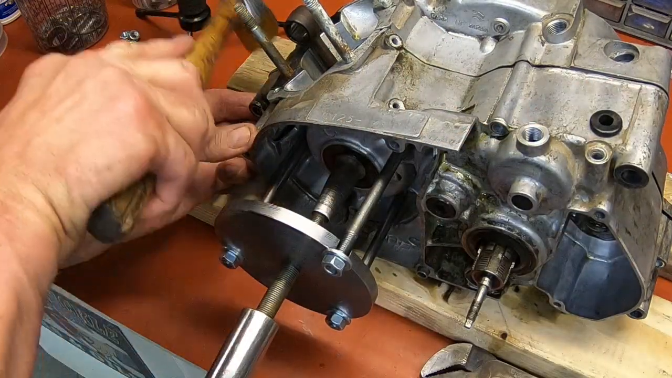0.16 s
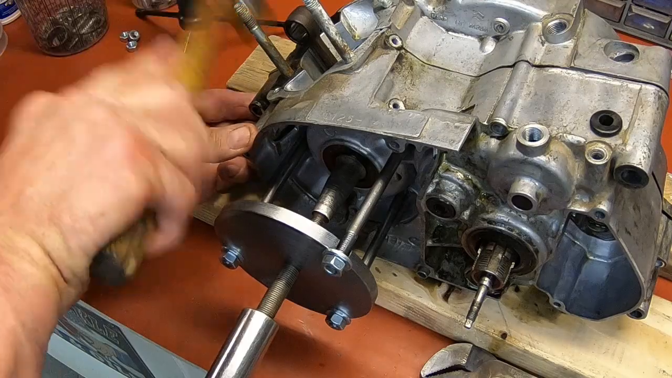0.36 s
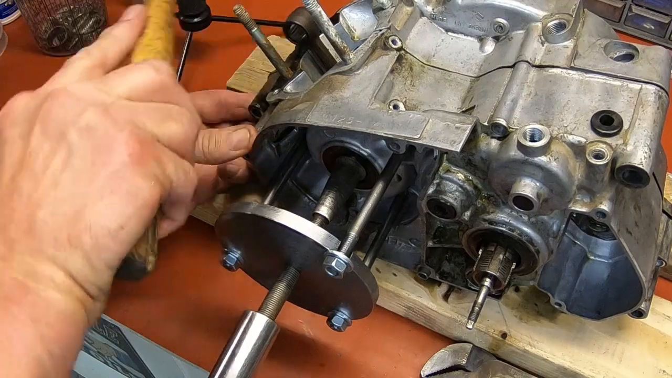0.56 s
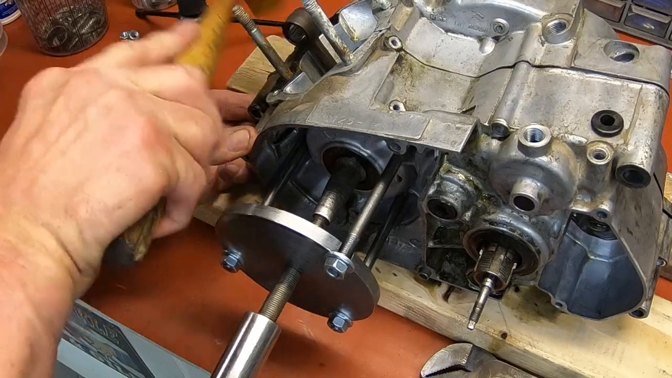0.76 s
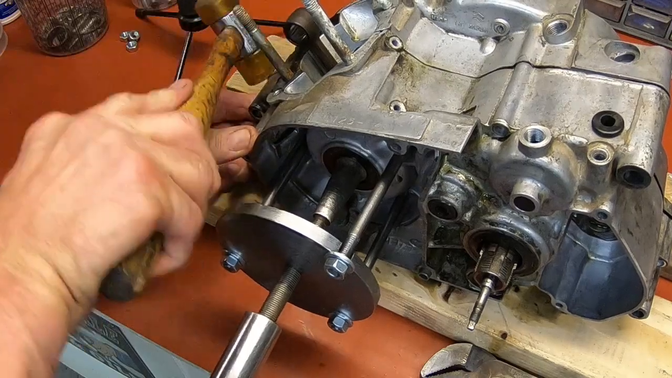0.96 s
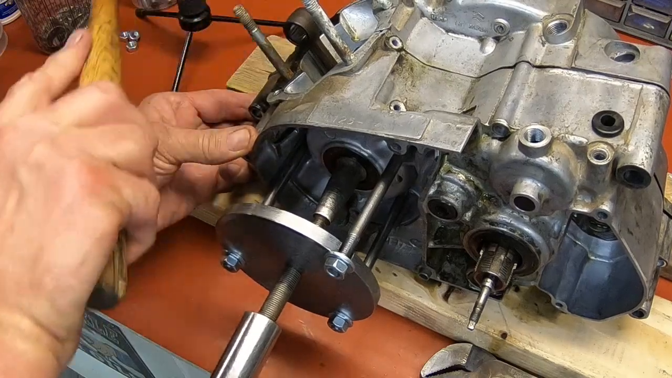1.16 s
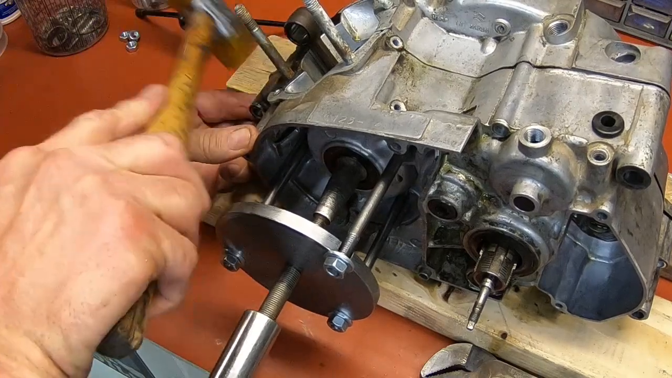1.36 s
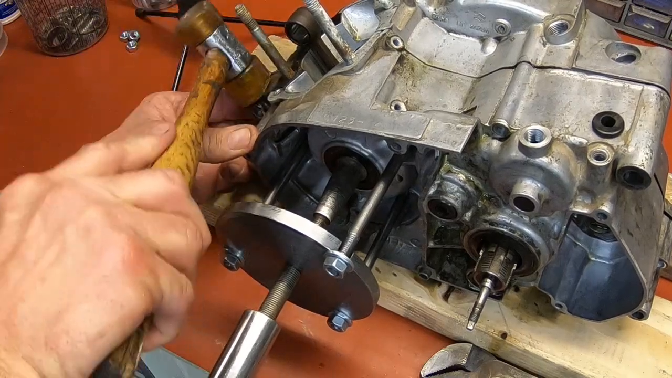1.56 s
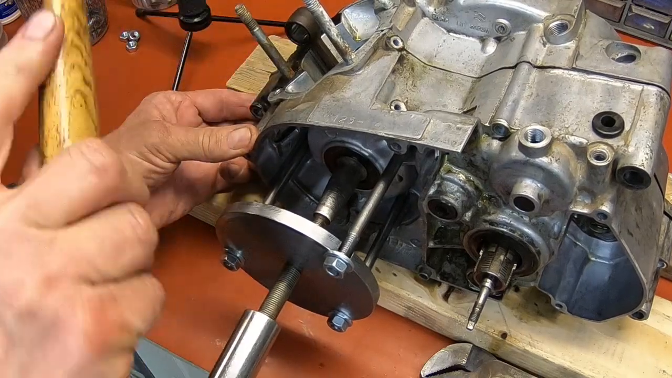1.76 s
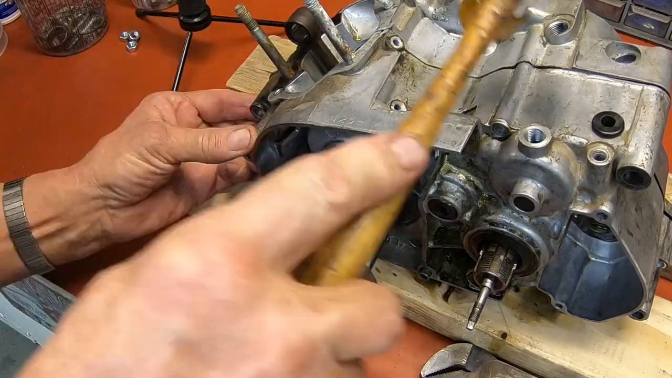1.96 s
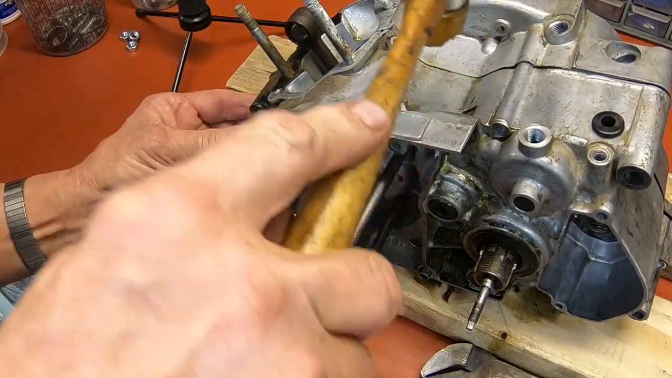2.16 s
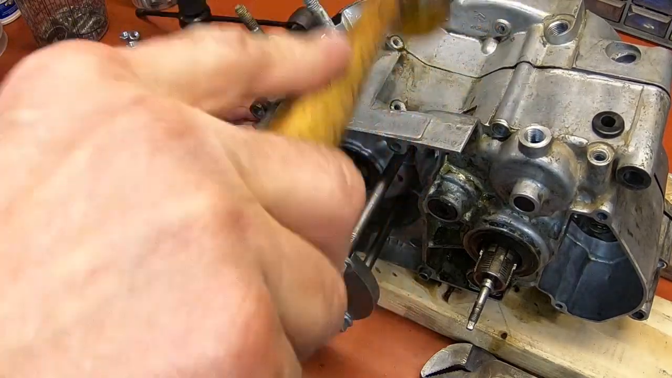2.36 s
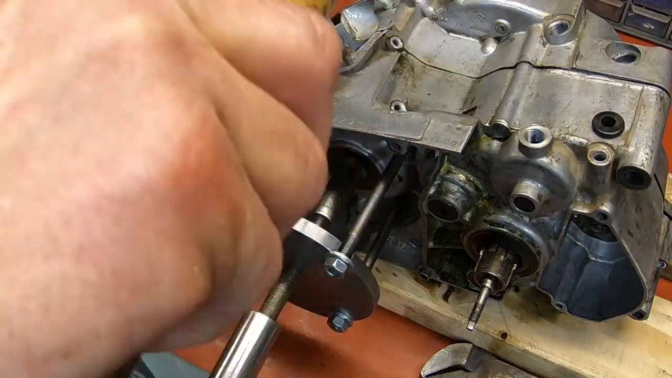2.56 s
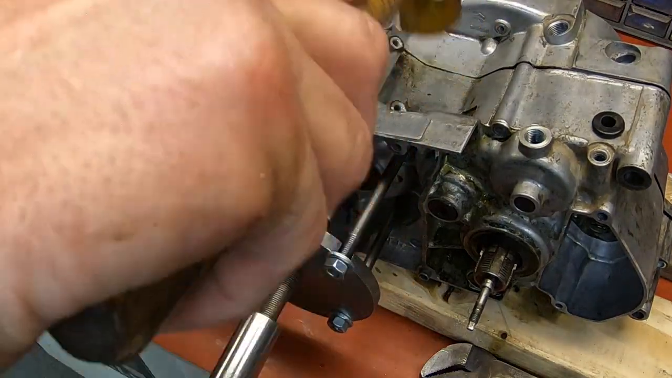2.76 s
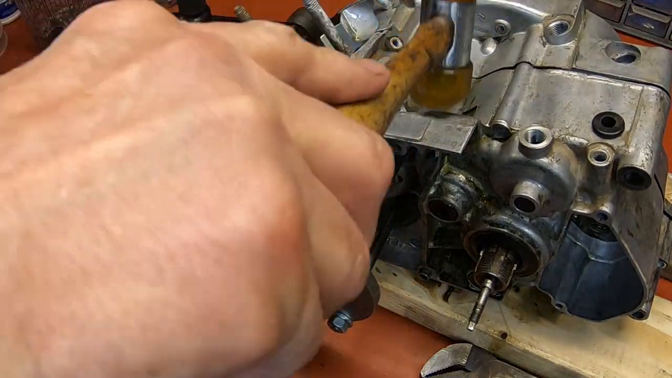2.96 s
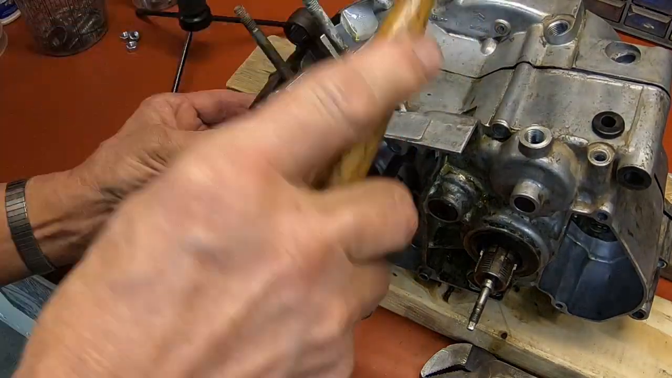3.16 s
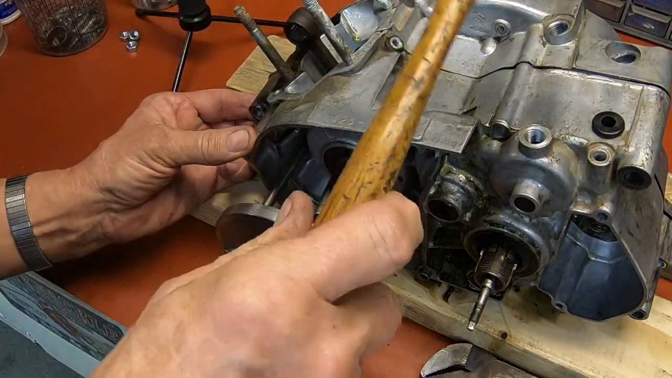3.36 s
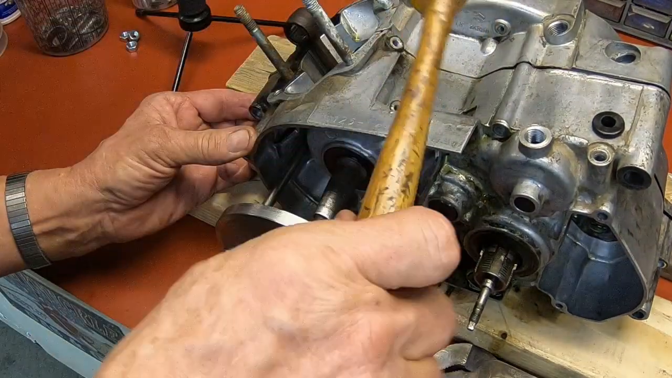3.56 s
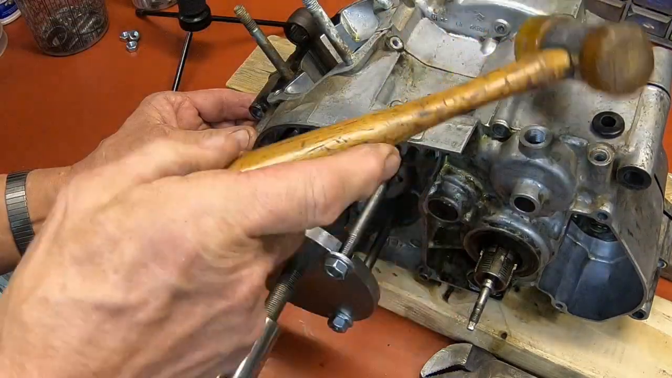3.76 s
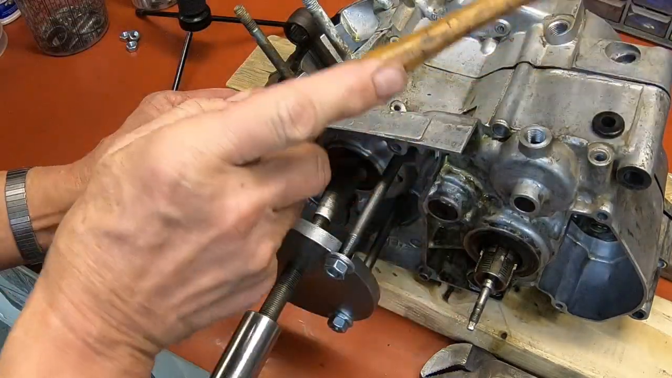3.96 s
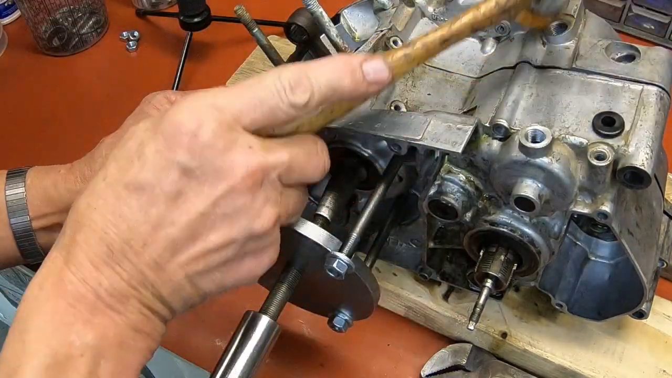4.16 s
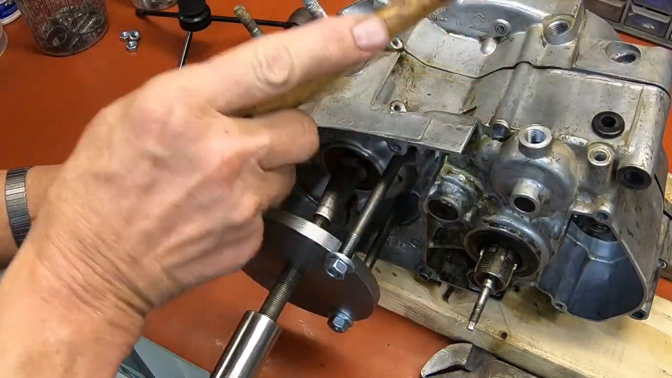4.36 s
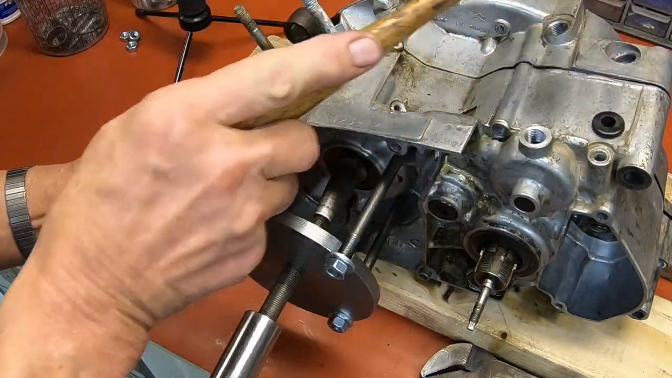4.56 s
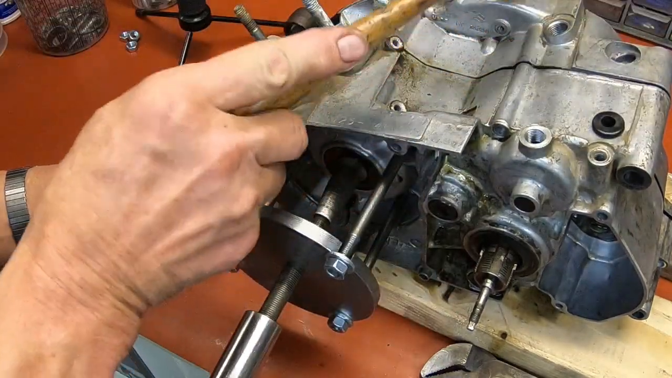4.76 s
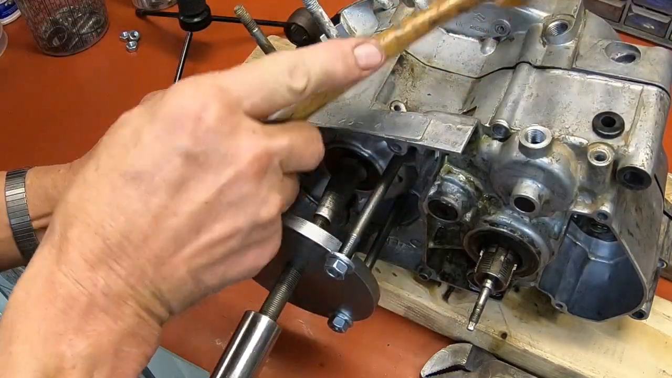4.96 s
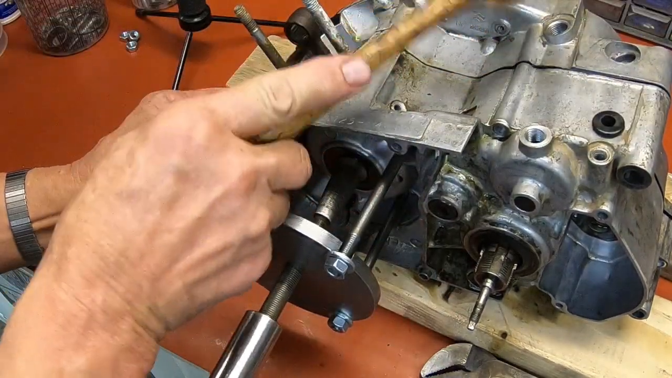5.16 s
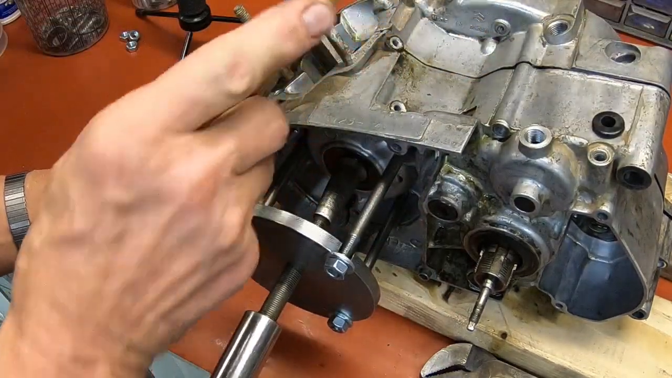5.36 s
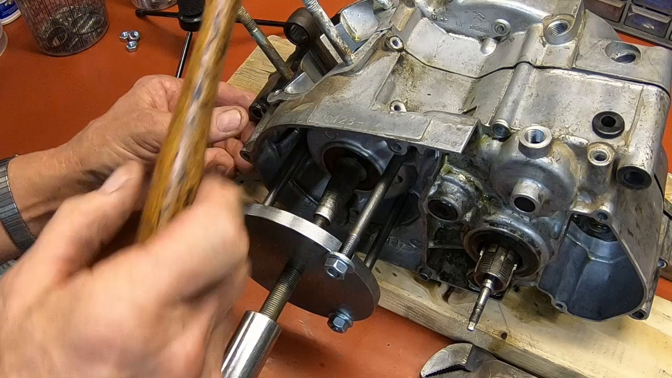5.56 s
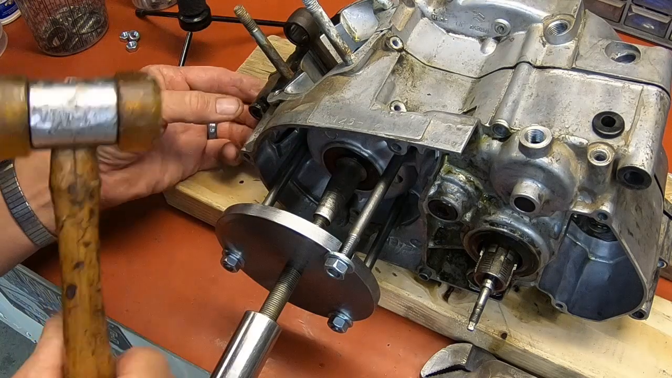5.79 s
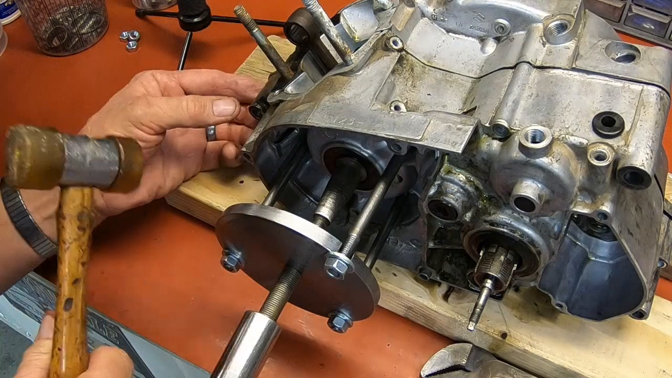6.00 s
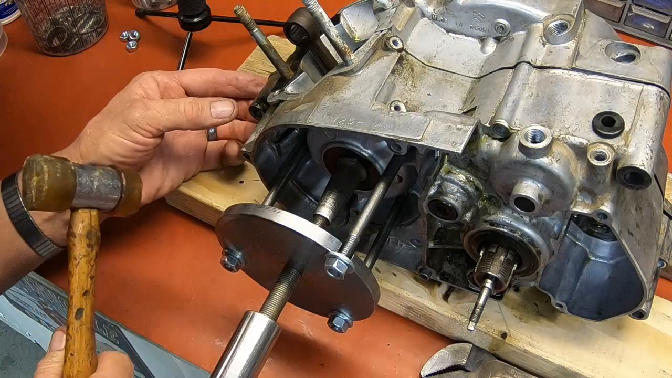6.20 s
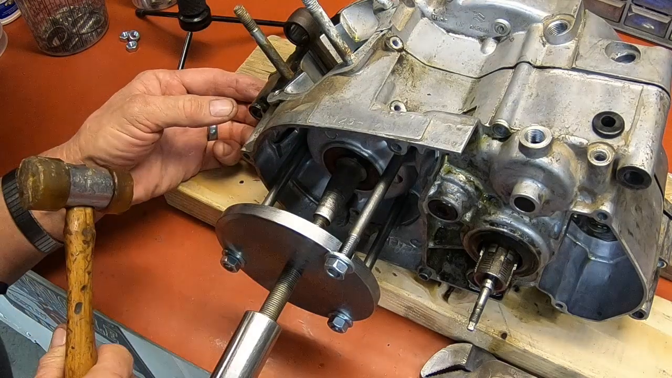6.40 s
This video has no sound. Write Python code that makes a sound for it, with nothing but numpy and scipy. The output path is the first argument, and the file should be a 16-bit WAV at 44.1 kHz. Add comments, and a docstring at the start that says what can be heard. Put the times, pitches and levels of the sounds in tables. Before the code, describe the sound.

A plastic mallet raps an aluminium engine case six times in quick succession, each hit ringing briefly and rattling loose studs. After a pause come three more knocks with a light metallic jingle and a low bump of air on the close microphone. A hand slides faintly on the handle, then a last run of taps builds in strength. The workshop adds a short echo and a faint hum.

```python
"""Mallet raps on an engine crankcase

A plastic mallet strikes an aluminium crankcase on a wooden block, at three spots in turn. Each impact
excites the damped modes of the case; loose studs and a puller rattle, rebounds tick, and the workshop
reverberates. A hand slides on the handle between the rounds, air rumbles round the microphone,
machines hum far off, and the loudest raps overload the recorder."""
import sys
import numpy as np
from scipy import signal
from scipy.fft import rfft, irfft, next_fast_len
from scipy.io import wavfile
from scipy.ndimage import uniform_filter1d, map_coordinates

SR = 44100
rng = np.random.default_rng(int(sys.argv[2]) if len(sys.argv) > 2 else 0)


def put_to_file(sound):
    """Save the sound as 16-bit audio at rate SR, in the file named by the first command-line argument."""
    columns = np.atleast_2d(sound).T  # one column per channel
    safe = np.clip(columns, -1, 1)
    whole_steps = np.round(safe * 32767)
    wavfile.write(sys.argv[1], SR, whole_steps.astype(np.int16))


N = 283665

# mallet blows: start_s, level_db, then relative to it: hardness_db, fullness_db, rattle_db, jingle_db
BLOWS = [(0.013, 4, 4.5, -10, -8, -25), (0.317, 5.5, 4.5, -8, -13, -22), (0.588, 5, 3.5, -6.5, -13, -33),
         (0.849, 5, 5.5, -11, -9, -29), (1.194, 4, 7, -6.5, -12.5, -30.5), (1.44, -3, 6.5, -5, -6, -23),
         (2.337, -1, -2, -1.5, -5.5, 1), (2.604, 1.22, 9, -2.5, -4.5, -13), (2.831, 1.5, 6.5, -3.5, -7, -9),
         (3.75, -18, 3.5, -3.5, -19, -56), (4.099, -5.5, -1.7, 3, -22, -50),
         (4.364, 3, 0.8, -4, -19.5, -28), (4.599, 3.5, .6, -1.1, -15.5, -30.5),
         (4.852, 4.5, -0.36, -4, -14.5, -23), (5.104, 5, -3, -5, -12.5, -24),
         (6.085, -38.5, -7, 1.52, -36, -45)]
# the mallet moves on to the second and third spot: start_s
SPOT_CHANGES = [2, 3.9]
# what a blow shakes, relative to its level, one row a spot: thump_db, chatter_db, shudder_db
COUPLING = [(-31, -36, -44), (-40, -33, -49), (-30, -32.5, -48)]


def amp(db):
    """Amplitude ratio of a level in decibels."""
    return 10 ** (np.asarray(db) / 20)


def unit(x):
    """Normalisation to an rms of 1."""
    return x / np.sqrt(np.mean(x ** 2) + 1e-20)


def along(points, hz):
    """Interpolation of (frequency_hz, value) points on a logarithmic frequency axis."""
    knots_hz, values = np.transpose(points)
    return np.interp(np.log(hz + 1), np.log(knots_hz + 1), values)


def filtered(x, response):
    """Linear filtering: the spectrum of x times a frequency response."""
    size = next_fast_len(len(x) + 8192)
    return irfft(rfft(x, size) * response(np.fft.rfftfreq(size, 1 / SR)), size)[:len(x)]


def hiss(spectrum, size):
    """Spectrally shaped Gaussian noise of rms 1."""
    return unit(filtered(rng.standard_normal(size), lambda hz: amp(along(spectrum, hz))))


def wobble(rate_hz):
    """Random modulation: a spline through rate_hz random knots a second."""
    knots = rng.standard_normal(int(N * rate_hz / SR) + 4)
    return map_coordinates(knots, [np.arange(N) * rate_hz / SR])


def swells(rows):
    """Summed envelopes with exponential flanks: 20 dB gained per rise_s, lost per fall_s."""
    t = np.arange(0, N / SR, 1e-3)
    gain = sum(amp(db - 20 * np.maximum((peak_s - t) / rise_s, 0)
                   - 20 * np.maximum((t - peak_s - hold_s) / fall_s, 0))
               for peak_s, db, hold_s, rise_s, fall_s in rows)
    return np.interp(np.arange(N) / SR, t, gain)


def add(track, start_s, x):
    """Superposition of x on track from start_s on."""
    part = track[round(start_s * SR):][:len(x)]
    part += x[:len(part)]


def ring(hz, t60, db, t, scatter_db, waver):
    """Damped modes; loose joints give each phase a random walk of waver radians per root millisecond."""
    gain = amp(db + scatter_db * rng.standard_normal(len(hz)))
    walk = np.cumsum(rng.standard_normal((len(hz), len(t))), axis=1) / np.sqrt(SR / 1000)
    wander = uniform_filter1d(waver[:, None] * walk, size=40, axis=1)
    return gain @ (amp(-60 * t / t60[:, None]) * np.sin(2 * np.pi * hz[:, None] * t + wander))


def room(x, wet_db, knock_t60=.039, late_share=.35):
    """Reverberation: x plus a diffuse tail that builds up and then decays fastest in the treble."""
    # reverberation time of the workshop: frequency_hz, t60_s
    decay_times = [(150, 0.98), (700, 0.44), (2000, 0.47), (5000, 0.36), (10000, 0.24), (15000, 0.03)]
    hz, t, spectra = signal.stft(rng.standard_normal(SR * 3 // 4), SR, nperseg=256)
    tail = signal.istft(spectra * amp(-60 * t / along(decay_times, hz)[:, None]), SR, nperseg=256)[1]
    tail *= 1 - np.exp(-np.arange(len(tail)) / SR / 0.012)
    # the walls get mostly the broad first knock; the later ring stays close to the case
    knock = x * (late_share + amp(-60 * np.arange(len(x)) / SR / knock_t60))
    wet = amp(wet_db) * signal.fftconvolve(knock, tail / np.linalg.norm(tail))
    return wet + np.pad(x, (0, len(wet) - len(x)))


def workshop():
    """Ambient noise: broadband room tone under machine tones that drift in amplitude and phase."""
    # room tone: frequency_hz, density_db
    spectrum = [(59, -37), (100, -10.5), (178, -3), (285, -3.5), (331, -7), (360, -2.5), (446, -6.5),
                (486, -6.5), (564, -10.5), (778, -5), (2360, -16.5), (15100, -35), (16500, -45)]
    # distant machines: pitch_hz, level_db
    machines = [(479.1, -71.5), (597.5, -75.5), (764.4, -81), (882.9, -85), (1104, -74), (5265, -90.5),
                (12021, -101.5)]
    t = np.arange(N) / SR
    hum = sum(amp(db + 4.1 * wobble(6)) * np.sin(2 * np.pi * hz * t + .8 * wobble(5))
              for hz, db in machines)
    return amp(-60 + .7 * wobble(3)) * hiss(spectrum, N) + hum


def rumble():
    """Low-frequency noise at the microphone from airflow, handling and the stand shuddering at blows."""
    # air moving round the microphone: time_s, level_db
    airflow = [(0, -65), (2.0, -67), (2.25, -60), (2.9, -63), (3.2, -55), (3.75, -59), (4.0, -65),
               (5.0, -68), (5.3, -57.5), (5.7, -54.5), (6.43, -65)]
    # handling bumps: peak_s, level_db, hold_s, rise_s, fall_s
    bumps = [(.42, -50.5, 0.021, .08, 0.037), (1.72, -52, 0.009, 0.093, 0.056),
             (1.89, -50, .01, 0.037, .05), (2.31, -36, .015, .06, .06), (3.46, -54.5, .01, .1, 0.067),
             (3.83, -48.5, 0.017, .09, 0.077), (5.47, -52.5, 0.0193, .15, 0.058)]
    # the rumble's colour: frequency_hz, density_db
    spectrum = [(15, -11), (35, 3.5), (70, -2.5), (140, -12.5), (300, -59), (900, -89)]
    draught = amp(np.interp(np.arange(N) / SR, *np.transpose(airflow), left=-200, right=-200))
    rise_s, fall_s = .025, .17
    shudders = []
    for start_s, db, *_ in BLOWS:
        *_, shudder_db = COUPLING[np.searchsorted(SPOT_CHANGES, start_s)]
        shudders.append((start_s + rise_s, db + shudder_db, 0, rise_s, fall_s))
    lumpy_noise = unit(amp(2.1 * wobble(18)) * hiss(spectrum, N))
    return (draught + swells(bumps) + swells(shudders)) * lumpy_noise


def air_push():
    """A pressure transient: one push of air on the microphone, in three alternating lobes."""
    centre_s, width_s = 2.306, 0.00368
    u = (np.arange(N) / SR - centre_s) / width_s
    rebound = 0.41 * np.exp(-.6 * (u - 2.1) ** 2) - .2 * np.exp(-.4 * (u - 4.5) ** 2)
    return amp(-21.5) * (rebound - np.exp(-2.2 * u ** 2))


def arm_swish():
    """Flow noise: the moving arm stirs the air."""
    # the arm coming and passing: peak_s, level_db, hold_s, rise_s, fall_s
    sweeps = [(2.2, -61, .06, .1, 0.05027), (2.296, -41, .01, 0.028, .05)]
    return swells(sweeps) * hiss([(60, -15), (130, -1), (300, -19.0), (600, -20.5), (1500, -90)], N)


def whistle():
    """Narrow-band noise, heard twice as a faint whistle."""
    # whistles: peak_s, level_db, hold_s, rise_s, fall_s
    whistles = [(2.95, -67, .1, .03, .3), (3.66, -63, .02, .13, .1)]
    pitch_hz, half_width_hz = 4020, 45
    band = lambda hz: 1 / (1 + ((hz - pitch_hz) / half_width_hz) ** 2)
    return swells(whistles) * unit(filtered(rng.standard_normal(N), band))


def hand_slide():
    """Friction noise: skin hisses unevenly along the varnished handle."""
    # strokes of the hand: peak_s, level_db, hold_s, rise_s, fall_s
    strokes = [(3.082, -67, 0.051, 0.2, 0.05), (3.3, -70, .01, 0.12, 0.01),
               (3.382, -65.5, .02, 0.0946, 0.05), (3.526, -65, 0.0096, .025, .09),
               (3.625, -63.5, .02, 0.09, 0.2), (5.43, -61, .04, 0.2, 0.0136),
               (5.59, -62.5, 0.036, 0.07, 0.14), (5.67, -58, 0.0395, .14, 0.09),
               (5.825, -61.5, .05, 0.03, 0.1)]
    # skin on varnish: frequency_hz, density_db
    spectrum = [(1060, -50), (1800, -27), (2400, -3.5), (3290, -7.5), (4070, -4), (5420, -10), (6350, -4),
                (15200, -18), (16000, -19.5), (16500, -38.5)]
    return swells(strokes) * amp(1.3 * wobble(60)) * hiss(spectrum, N)


def rebounds():
    """Secondary impacts: short knocks and ticks, mostly just after a blow, each a damped noise burst."""
    # second knocks and ticks: start_s, level_db, pitch_hz, spread_octaves, t60_s
    impacts = [(0.373, -33, 3940, 0.65, 0.033), (.4015, -14, 2890, 0.11, 0.013),
               (.627, -20.5, 1500, 0.98, 0.014), (.890, -24, 7496, .8, .02), (.910, -17, 883, 0.41, 0.021),
               (1.256, -48, 1200, 0.84, 0.012), (2.888, -21, 801, 1.6, .05),
               (3.665, -29.5, 8490, 0.71, 0.003), (4.388, -23.5, 1210, .5, .03),
               (4.908, -26, 550, .5, 0.081), (5.165, -24.5, 998, 1.11, 0.081),
               (5.175, -32, 9200, .4, 0.0086)]
    out, t = np.zeros(N), np.arange(SR // 10) / SR
    for start_s, db, hz, octaves, t60 in impacts:
        band = lambda f: np.exp(-.5 * (np.log2((f + 1) / hz) / octaves) ** 2) / (1 + (f / 10500) ** 6)
        envelope = amp(-60 * t / t60) * (1 - np.exp(-t * hz / 1.2))
        burst = envelope * unit(filtered(rng.standard_normal(len(t)), band))
        add(out, start_s, amp(db) * room(burst, wet_db=-24))
    return out


def loose_studs(t, rattle_db, chatter_db):
    """Contact noise: washers and studs rattle briefly and go on chattering in uneven knocks."""
    # first rattle: frequency_hz, density_db
    rattle_spectrum = [(200, -62), (600, -33), (1500, 2), (3000, -4), (5500, -8.5), (8500, -12.5),
                       (11000, -21), (14000, -31.5), (16500, -33.5)]
    # longer chatter: frequency_hz, density_db
    chatter_spectrum = [(1000, -33.5), (2500, -1), (6000, -6.5), (10500, -14), (13000, -23), (16000, -26.5),
                        (17000, -58)]
    rattle = amp(rattle_db - 60 * t / 0.044) * hiss(rattle_spectrum, len(t))
    knocks = np.interp(t * 300, np.arange(60), rng.standard_normal(60))  # 300 new levels a second
    chatter = amp(chatter_db + 2.1 * knocks - 60 * t / 0.15) * hiss(chatter_spectrum, len(t))
    return rattle + chatter


def puller_jingle(t, spot):
    """Coupled vibration: the knock passes through the threads and rings the puller's steel rods."""
    # rod modes: pitch_hz, t60_s, level_db
    modes = [(9890, 0.045, -4), (10160, 0.025, -5), (10860, 0.029, -5.5)]
    # lag of the rods behind the blow, one a spot: delay_s
    lags = [0.016, 0.0035, .01]
    rods = ring(*np.transpose(modes), t, scatter_db=1.0, waver=np.full(len(modes), 1.1))
    onset = 1 - np.exp(-t / 0.0024)
    return np.pad(rods * onset, (round(lags[spot] * SR), 0))[:len(t)]


def case_ring(t, spot, hardness_db, fullness_db):
    """Modal vibration: the point of impact sets how strongly each mode of the crankcase is excited."""
    # case modes: pitch_hz, t60_s, first_spot_db, second_spot_db, third_spot_db
    modes = [(269, 0.11, -11.5, -36, -22), (441.3, 0.066, -3, -1.5, -5), (586, 0.095, -9.5, -7.5, -9),
             (748, 0.084, -9, -11, -3.5), (789.1, 0.075, -0.8, 2, -7.5), (895, 0.072, -10.5, -9.5, -8),
             (1063, 0.051, -10, -2, -9), (1157, .06, -10, -3.5, -4.5), (1276.8, 0.08, -0.77, -7.5, -4.5),
             (1386.4, 0.11, -8.5, -10, -4.5), (1524.5, 0.04, -4, -4, -3), (1665.6, .05, -15, -11, -9),
             (1810, 0.069, -18.5, -11.5, -14), (2036, 0.04, -16, -9.5, -13.5),
             (2240, 0.031, -11.5, -13, -16), (2527, 0.029, -9, -4.5, -18.5),
             (2890, 0.014, -29.5, -7, -16.5), (3560, 0.013, -25.5, -23.5, -9),
             (4090, 0.076, -28.5, -20.5, -23.5), (4960, 0.031, -32.5, -18.5, -30),
             (5200, 0.086, -33.5, -21, -19.5), (6334, 0.053, -15, -30, -32.5), (6970, .04, -24.5, -24, -29),
             (8260, 0.08, -32, -29, -29)]
    # damping as the case drops back on hand and block, one row a spot: delay_s, gain_db
    chokes = [(.024, -22), (0.022, -12), (0.022, -10)]
    hz, t60, *spot_db = np.transpose(modes)
    choke_s, choke_db = chokes[spot]
    damping = amp(choke_db / (1 + np.exp(-(t - choke_s) / 0.001)))
    # a hard, glancing blow feeds the high modes, a flat and full one the low modes
    strength_db = spot_db[spot] + hardness_db * np.clip(np.log2(hz / 1500), 0, 1)
    strength_db += fullness_db * np.clip(2 * np.log2(760 / hz), 0, 1)
    ringing = ring(hz, t60, strength_db, t, scatter_db=2.5, waver=0.32 * (hz / 1000) ** 0.62)
    return amp(-7.5) * damping * ringing


def mallet_blows():
    """Impact excitation: each blow rings the case, shakes its loose parts and thumps the bench."""
    # sound sent to the walls, one row a spot: wet_db, knock_t60_s, late_share
    walls = [(-17, .036, 0.32), (-9.5, .014, 0.09), (-9, 0.016, 0.09)]
    thump_hz, thump_t60_s = 158.9, .1
    out, t = np.zeros(N), np.arange(SR // 6) / SR
    contact = 1 - np.exp(-(t / 0.0022) ** 5)  # the plastic face flattens before the force peaks
    for start_s, db, hardness_db, fullness_db, rattle_db, jingle_db in BLOWS:
        spot = np.searchsorted(SPOT_CHANGES, start_s)
        thump_db, chatter_db, _ = COUPLING[spot]
        case = case_ring(t, spot, hardness_db, fullness_db)
        studs = loose_studs(t, rattle_db, chatter_db)
        jingle = amp(jingle_db) * puller_jingle(t, spot)
        thump = amp(thump_db - 60 * t / thump_t60_s) * np.sin(2 * np.pi * thump_hz * t)
        add(out, start_s, amp(db) * room(contact * (case + studs + jingle + thump), *walls[spot]))
    return out


def scene():
    """Superposition of all sources at one microphone."""
    work = mallet_blows() + rebounds() + whistle() + hand_slide() + arm_swish()
    return (work + air_push() + rumble() + workshop())[None]


def record(dry):
    """Saturation and band limiting: the input stage flattens the loudest peaks and cuts the top treble."""
    ceiling, top_hz = .97, 16500
    soft = dry[0] / (1 + np.abs(dry[0] / ceiling) ** 5) ** (1 / 5)
    return filtered(soft, lambda hz: hz < top_hz)[None]


dry = scene()
out = record(dry)
put_to_file(out)
```